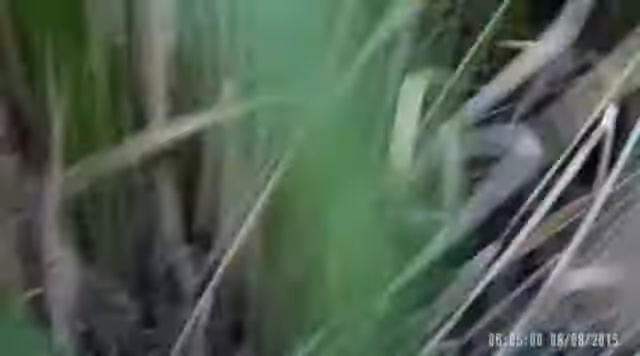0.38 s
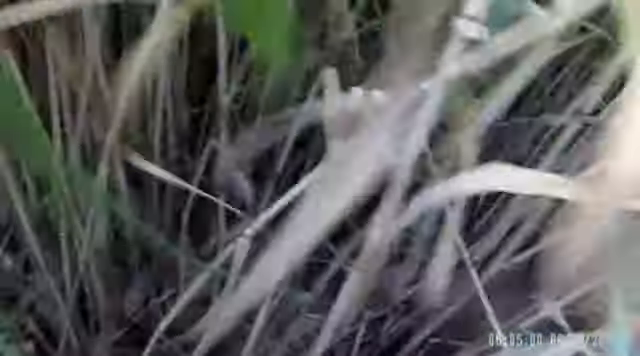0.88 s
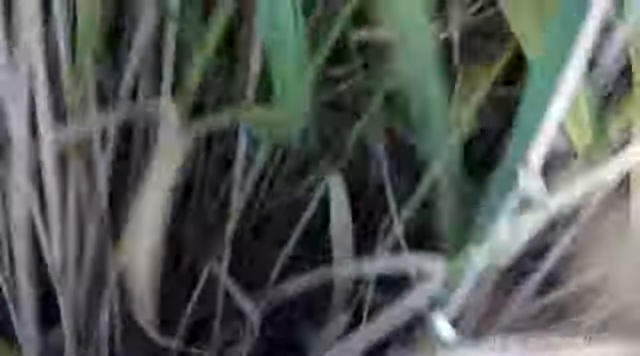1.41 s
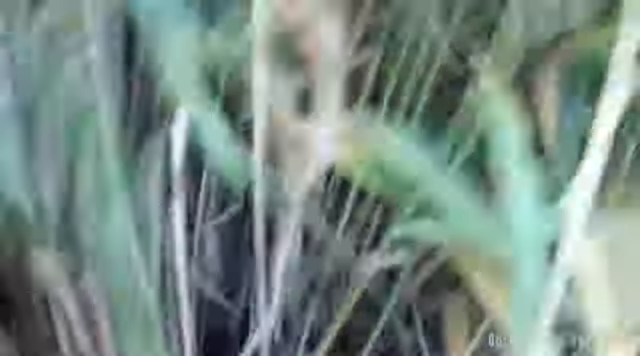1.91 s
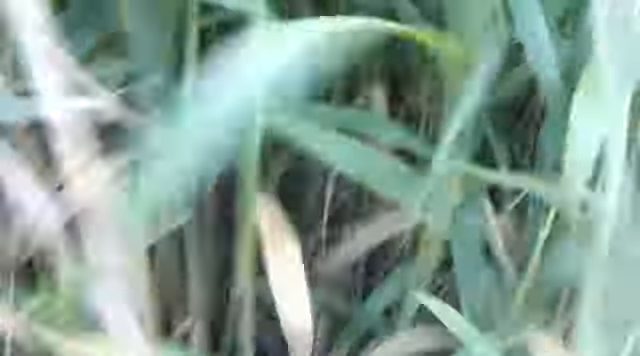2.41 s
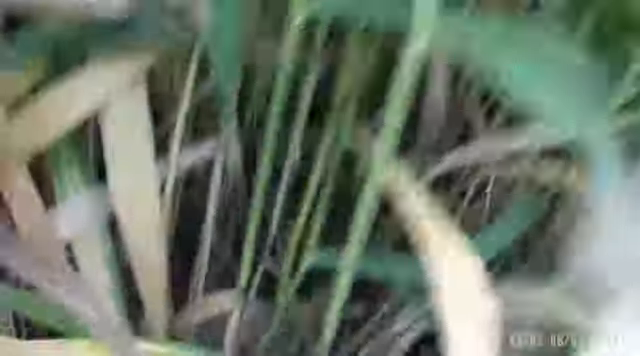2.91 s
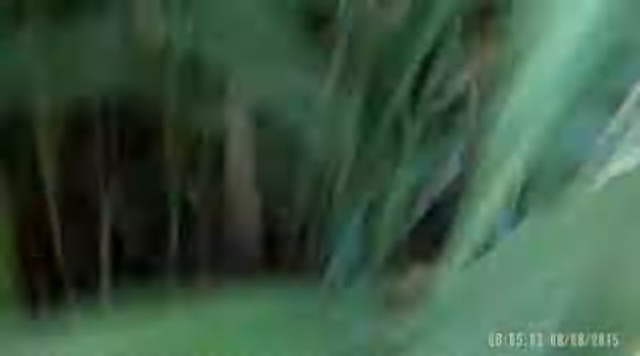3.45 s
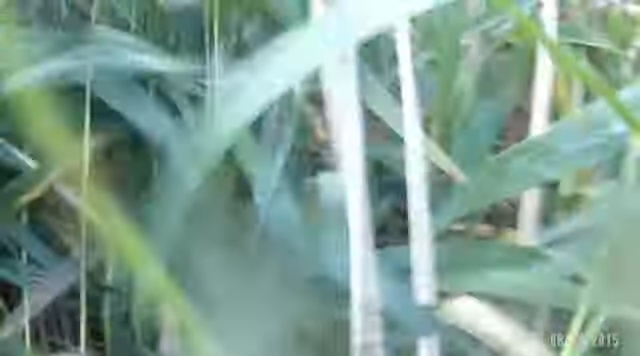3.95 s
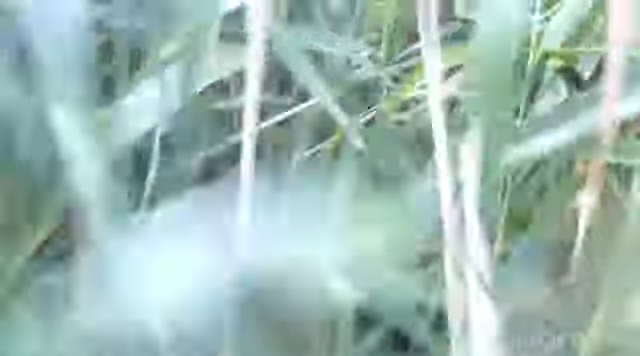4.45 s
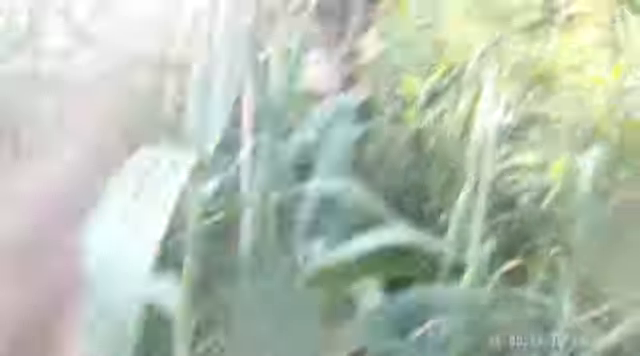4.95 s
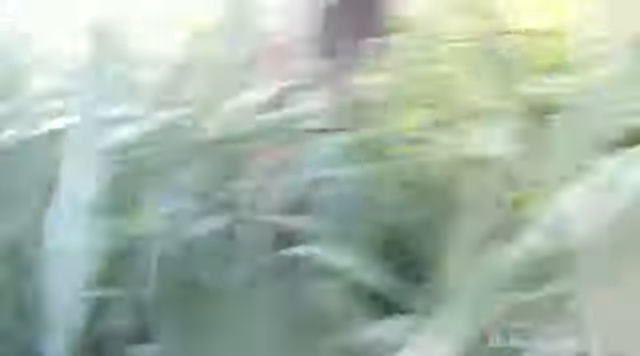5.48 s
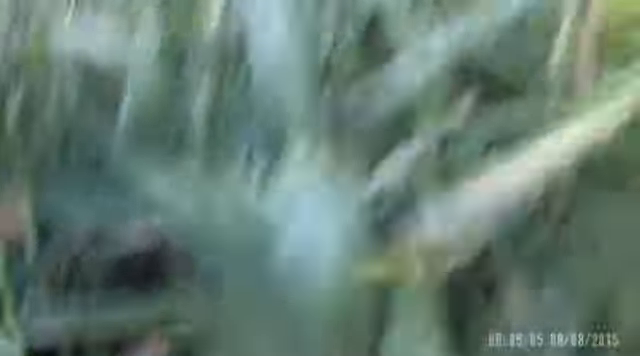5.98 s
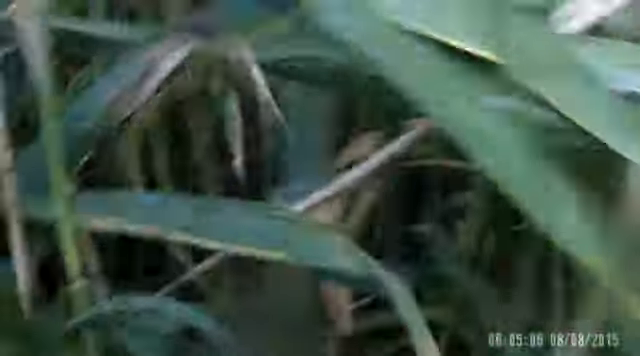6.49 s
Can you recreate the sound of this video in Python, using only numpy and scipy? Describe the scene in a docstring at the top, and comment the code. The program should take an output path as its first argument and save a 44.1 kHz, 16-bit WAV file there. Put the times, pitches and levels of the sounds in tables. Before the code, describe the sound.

Close, dry rustling as a person pushes through thick marsh reeds outdoors. Leaves swish in overlapping sweeps, stems scrape, cloth rubs the body-worn camera. Soft knocks and brittle snaps scatter through, crowding together just before four seconds. After five, two firm knocks precede one enormous, distorted thump; then the rustling thins. The microphone sits inside the small housing, practically mono, with no echo and faint hiss.

```python
"""Someone wearing a small camera pushes through dense marsh reeds: leaves swish, stems scrape and cloth rubs
from the start, as patchy friction noise over a low body sway and faint hiss. Soft knocks come at once, then
snaps: crackling noise bursts with a leafy shiver. Both crowd together just before four seconds; after five come
two more firm knocks, then one very hard blow that overloads the input, and sparser rustling to the end.
Each knock is a short push and rebound that rings the housing's low modes."""
import sys
import numpy as np
from scipy import signal
from scipy.fft import rfft, irfft
from scipy.io import wavfile
from scipy.ndimage import uniform_filter1d, map_coordinates

SR = 44100
rng = np.random.default_rng(int(sys.argv[2]) if len(sys.argv) > 2 else 0)


def ratio(d):
    """dB to gain"""
    e = np.asarray(d, float) / 20
    return 10 ** e


def waveform_to_disk(signal):
    """Save audio, clipped to [-1, 1], as 16-bit WAV at the path in sys.argv[1]."""
    frames = np.transpose(np.atleast_2d(signal))
    scaled = np.clip(frames, -1, 1) * 32767
    samples = np.round(scaled).astype(np.int16)
    wavfile.write(sys.argv[1], SR, samples)


N = 291632  # length [samples]

# lurches of the body from step to step: (time [s], level [dB])
LURCHES = [(0.0, -65), (0.16, -63), (0.4, -70), (1.16, -72), (1.25, -67), (1.86, -60), (2.08, -66),
           (2.82, -69), (3.42, -65), (3.62, -56), (3.87, -59), (4.33, -71), (4.53, -67.5), (5.39, -62.5),
           (5.49, -58.5), (6.17, -74), (6.28, -70), (6.61, -69)]
# armfuls of leaves sweeping past; rise and fall are the times to 6 dB below the peak:
# (peak time [s], leaf level [dB], rise [s], fall [s], dry edge over leaf [dB])
LEAF_SWEEPS = [(.17, -45.5, .2, .16, -2.5), (.46, -48.5, 0.17, 0.18, -6.5), (.81, -45.5, 0.069, 0.099, -2),
               (.94, -49.5, 0.086, 0.088, 0), (1.68, -50, 0.065, 0.11, -5), (1.86, -45.5, 0.11, 0.14, -2.5),
               (2.04, -49.5, 0.093, 0.2, -2), (2.27, -49, 0.075, .08, -2), (2.42, -49, 0.12, 0.098, 0),
               (2.7, -59.5, 0.22, 0.083, 0), (3.05, -58, 0.15, 0.13, 1.5), (3.54, -51.5, 0.12, 0.11, -2.5),
               (3.75, -48, 0.13, 0.085, -2.5), (3.93, -48, 0.1, 0.1, -2), (4.07, -53, 0.078, 0.15, -1),
               (4.64, -49, 0.13, 0.12, -1), (4.83, -50.5, 0.12, 0.17, -4.5), (5.36, -52, 0.11, 0.13, -1),
               (5.56, -55.5, 0.1, 0.096, -13), (5.84, -54, .1, .07, -3), (6.02, -49.5, 0.13, 0.13, -3),
               (6.5, -54.5, 0.31, 0.19, -3.5)]
# reeds dragging along clothing and housing, rise and fall as above:
# (peak time [s], cloth level [dB], rise [s], fall [s], stem scrape over cloth [dB])
REED_DRAGS = [(.07, -55.5, .12, 0.18, 2.5), (.66, -57, 0.12, 0.087, -11), (.8, -52.5, 0.058, 0.097, 7),
              (.95, -57.5, 0.039, 0.069, 6), (1.2, -57.5, 0.034, 0.059, -4),
              (1.44, -55.5, 0.11, 0.065, -17), (1.6, -57, 0.058, 0.14, -3), (1.84, -52, 0.072, 0.095, 3),
              (2.03, -54, 0.11, 0.12, 1), (2.24, -52.5, 0.048, 0.076, 1.5), (2.4, -53, 0.056, 0.071, 6),
              (2.72, -63, 0.064, .05, -3), (2.89, -59.5, 0.042, 0.1, -1), (3.13, -55.5, .05, 0.21, -12),
              (3.45, -53, 0.091, 0.21, -2), (3.68, -57, 0.09, 0.073, -2), (3.85, -47, .05, .1, 0.5),
              (4.03, -57.5, 0.098, 0.11, 7), (4.64, -55.5, 0.11, 0.17, 2.5), (5.12, -56, 0.1, 0.09, -4),
              (5.35, -51.5, 0.1, 0.11, 2), (5.69, -55.5, 0.058, .06, -8), (5.88, -55.5, 0.062, 0.085, -0.5),
              (6.02, -53.5, 0.1, 0.083, 0), (6.58, -58.5, 0.094, .1, 1)]
# broad green blades sliding over the camera, hissing higher than dry ones: (time [s], share [0-1])
GREEN_BLADES = [(0, 0.33), (.5, 0), (1.5, 0.18), (2.5, 0.17), (3.1, 0.17), (3.45, 0.65), (3.8, 0.43),
                (4.1, 0.01), (4.6, 0.26), (5.1, 0.1), (5.8, 0.07), (6.6, 0)]
# stems knocking and shoving the housing:
# (time [s], relative blow level [dB], contact frequency [Hz], contact length [swings])
HOUSING_KNOCKS = [(0.052, -40, 343, 0.82), (1.2435, -37.5, 381, 0.75), (1.812, -48, 95, 1.4),
                  (2.0707, -33, 614, 1.1), (2.1393, -38.5, 408, 1.2), (2.413, -37, 103, 0.73),
                  (2.4956, -24.5, 660, 1.76), (2.6588, -40, 514, 1.2), (2.7748, -39, 597, 1.3),
                  (2.949, -32.5, 640, 1.13), (3.0394, -33, 433, 0.73), (3.3733, -38, 403, 0.86),
                  (3.4145, -41, 373, 1.2), (3.517, -45, 76, 1.5), (3.5536, -27.5, 610, 1.23),
                  (3.8148, -31.5, 269, 1.4), (3.8565, -49, 91, 1.5), (3.817, -43, 92, 1.4),
                  (3.821, -31, 361, 0.77), (3.886, -29, 354, .95), (3.8955, -19.5, 293, .61),
                  (3.9057, -19.5, 400, 0.67), (3.9085, -14.5, 785, 0.85), (3.9113, -26, 296, 1.3),
                  (3.9152, -25, 101, 0.93), (4.005, -45, 87, 1.4), (4.0715, -39, 598, 1.6),
                  (4.5692, -42, 376, 1.4), (5.0893, -26.5, 342, .91), (5.092, -22, 393, 0.7),
                  (5.107, -46, 325, 0.73), (5.4746, -33.5, 395, 0.64), (5.6016, 1, 415, 1.04),
                  (5.6147, -12.5, 311, 0.89), (5.644, -40, 116, 1.3), (5.6755, -44, 74, 1.9),
                  (5.7813, -42, 387, 1.2), (6.124, -55, 124, 7), (6.5742, -38.5, 582, 1.7)]
# ringing modes of the housing: (frequency [Hz], relative level [dB], t60 [s])
HOUSING_MODES = [(74, -14, 0.14), (125, -29, 0.13), (191, -5, 0.13), (249, -1, 0.11), (292.3, 0, 0.079),
                 (400, -11.5, 0.061), (533, -12, 0.087), (655, 5.5, 0.019)]
# stems snapping while their leaves flick:
# (time [s], relative stem level [dB], relative leaf level [dB], dry edge over leaf [dB], burst t60 [s])
STEM_SNAPS = [(0.3855, -55, -42, 0, 0.016), (0.7223, -40.5, -72, -14, .082), (0.768, -43, -57, -13, 0.013),
              (0.7772, -39, -62, -8, 0.0059), (0.7816, -37, -55, -15, 0.0087), (0.788, -35, -66, -4, 0.013),
              (0.7995, -53, -37.5, -2, .006), (.8385, -42, -53, 0, .011), (0.9056, -58, -37, 0, 0.0073),
              (0.9365, -41, -34, 5.5, 0.0053), (.943, -40, -45, -16, 0.016), (0.964, -49, -55, 12, .018),
              (1.4114, -42, -57, 0, .011), (1.6145, -49, -50.5, 3, .013), (1.6453, -42, -39.5, -1, 0.03),
              (2.4212, -40, -51, 3, 0.014), (2.438, -60, -46, -17, .008), (2.46, -47, -39.5, -5, 0.012),
              (2.4693, -48, -50, -10, 0.0073), (2.4868, -40, -38, -8, 0.0071),
              (2.4967, -43.5, -46, -20, .017), (2.5614, -65, -48, 1.5, 0.021), (2.66, -48, -53, -5, .0078),
              (2.7742, -47, -48, -10, 0.023), (2.9493, -39, -39.5, -8, 0.0075),
              (2.9525, -46, -43, -6, 0.021), (2.9849, -45, -62, 9, 0.014), (3.0146, -61, -47, -3, .023),
              (3.0367, -42, -45, 0, 0.039), (3.0416, -49, -47, 0, 0.015), (3.1037, -38.5, -51, -3, 0.0071),
              (3.1277, -54, -47.5, -18, .003), (3.1528, -61, -46.5, -3, 0.018),
              (3.1615, -66, -44.5, -7, 0.023), (3.1668, -62, -47, -10, .011),
              (3.2632, -69, -43.5, -16, .009), (3.2682, -65, -50, -9, .01), (3.2741, -67, -51, 0, .0075),
              (3.43, -47, -51, -2, .017), (3.4696, -59, -41, -7, 0.016), (3.5143, -60, -43.5, -4, .0082),
              (3.555, -32, -40, -15, 0.0049), (3.688, -46, -42.5, -1, .0039),
              (3.701, -45.5, -64, 12, .0121), (3.7814, -42, -41, -16, .0116), (3.807, -43, -68, -2, .016),
              (3.8203, -32, -31, -22, 0.0079), (3.8495, -47, -60, -10, .008),
              (3.8848, -49, -37.5, -5, .014), (3.897, -41, -41, -15, 0.0039),
              (3.9055, -37, -33.5, -6.5, 0.027), (3.9079, -34, -36, -14, 0.048),
              (3.916, -56, -45, -4, 0.012), (3.9732, -70, -46, 8.5, .0037), (4.013, -45, -45, -2, 0.0063),
              (4.0256, -42, -42, -5, 0.026), (4.071, -38, -41.5, 2, .02), (4.217, -46, -64, -10, .012),
              (5.0893, -46.5, -42.5, 5, 0.0044), (5.1653, -45.5, -56, -12, .034),
              (5.3492, -50, -42, 1, 0.022), (5.3545, -62, -47.5, 10, 0.023),
              (5.4163, -48, -44, -14, 0.0096), (5.6015, -11, -11, -16, 0.005), (5.605, -34, -50, -7, .016),
              (5.616, -41, -62, -15, 0.0059), (6.0191, -41, -49, -10, .0129), (6.0437, -48, -62, 0, .0107),
              (6.056, -44.5, -52, -14, .0113), (6.2565, -51, -51, 1, .0155),
              (6.5728, -46.5, -61, -1, .0099)]

# tone of each part through the microphone port, shape only: (frequency [Hz], relative level [dB])
# low sway of the body
SWAY_TONE = [(12, -35), (25, -8), (55, -2), (90, -11.5), (150, -29)]
# clothing rubbing the housing: (frequency [Hz], relative level [dB])
CLOTH_TONE = [(50, -24), (110, 0.5), (230, 0.5), (420, -2), (650, -8), (1100, -31)]
# scraping stems: (frequency [Hz], relative level [dB])
STEM_TONE = [(250, -11.5), (550, -4), (990, -5.5), (1740, -3.5), (2220, -7.5), (2900, -9.5), (4200, -39)]
# dry leaves: (frequency [Hz], relative level [dB])
LEAF_TONE = [(1900, -32), (3100, -7.5), (4200, -2), (5000, -1), (5700, -7.5), (6500, -9), (8000, -41)]
# green blades: (frequency [Hz], relative level [dB])
GREEN_TONE = [(2500, -33), (3900, -9), (4700, -6), (5300, 1.5), (5900, -8), (6700, -12.5), (8200, -31)]
# crisp dry leaf edges: (frequency [Hz], relative level [dB])
EDGE_TONE = [(5200, -30), (6600, -2.5), (8000, -3), (10400, -0.5), (11800, -3), (13300, -9.5), (14800, -12),
             (16500, -42)]
# faint steady hiss: (frequency [Hz], relative level [dB])
HISS_TONE = [(40, -18), (300, -1.5), (800, -0.5), (2000, -13.5), (6000, -5), (14000, -2.5), (16500, -26)]
# snapping stalk: (frequency [Hz], relative level [dB])
STALK_TONE = [(450, -30), (900, -9), (1200, -1), (1850, 0), (2300, -4), (3000, -12), (4200, -32)]
# cracking husk: (frequency [Hz], relative level [dB])
HUSK_TONE = [(4800, -10), (6000, -6.5), (7700, 6), (8600, -3), (10000, -24)]


def unit(x):
    """Scales a sound to rms 1."""
    return x / np.sqrt(np.mean(x ** 2) + 1e-20)


def wobble(rate):
    """A smooth random curve with rate knots a second."""
    knots = rng.standard_normal(int(N * rate / SR) + 4)
    return map_coordinates(knots, [np.arange(N) * rate / SR])


def follow(table):
    """Joins the (time, value) points of a table by straight lines, sample by sample."""
    return np.interp(np.arange(N) / SR, *np.transpose(table))


def coloured(x, tone, size=4096):
    """Gives x a tone through a causal filter; white noise keeps its power."""
    hz, db = np.transpose(tone)
    grid = np.fft.rfftfreq(size, 1 / SR)
    shape_db = np.interp(np.log(grid + 1), np.log(hz), db, left=-60, right=-60)
    # folding the cepstrum forward gives minimum phase, so the sound starts at once
    cepstrum = irfft(np.log(ratio(shape_db)))
    cepstrum[1:size // 2] *= 2
    cepstrum[size // 2 + 1:] = 0
    response = irfft(np.exp(rfft(cepstrum)))
    response *= np.hanning(2 * size)[size:] ** 2  # no long ringing
    response /= np.linalg.norm(response)
    filtered = signal.fftconvolve(np.atleast_2d(x), response[None], axes=1)
    return filtered[:, :x.shape[-1]].reshape(x.shape)


def strokes(rows):
    """Summed power of bell-shaped strokes, plain and with their last column added."""
    peak, db, rise, fall, other_db = np.transpose(rows)[:, :, None]
    late = np.arange(0, N + 64, 64) / SR - peak  # one point every 64 samples
    bells = ratio(db - 6 * (late / np.where(late < 0, rise, fall)) ** 2) ** 2
    powers = bells.sum(0), (bells * ratio(other_db) ** 2).sum(0)
    return [np.interp(np.arange(N) / 64, np.arange(len(p)), p) for p in powers]


def friction(per_second, spread_db, top_db, life, smooth, clump_db, patchy_db):
    """Countless slips of uneven size, each a short scratch (t60 life [s]), over the blur of farther ones."""
    count = int(per_second * N / SR)
    draws = rng.random((count, 2))
    sizes_db = -spread_db * np.log(1 - draws[:, 1])
    sizes = ratio(top_db * np.tanh(sizes_db / top_db))  # many small, none huge
    starts = np.bincount((draws[:, 0] * N).astype(int), sizes ** 2, N)
    fade = ratio(-120 * np.arange(SR // 10) / SR / life)  # a fade of power
    scratches = np.abs(signal.fftconvolve(starts, fade)[:N])
    power = smooth + scratches / scratches.mean()
    # noise whose level drifts in patches over time and pitch
    z = signal.stft(rng.standard_normal(N), nperseg=512)[2]
    field = rng.standard_normal(z.shape)
    field = uniform_filter1d(uniform_filter1d(field, 6, 0), 10, 1)
    noise = signal.istft(z * ratio(patchy_db * unit(field)), nperseg=512)[1][:N]
    return np.sqrt(power) * noise * ratio(clump_db * wobble(25))


def rustle():
    """Sweeps and drags set each friction part's level over the body's low sway; one brush shakes them all."""
    leaf_power, edge_power = strokes(LEAF_SWEEPS)
    rub_power, scrape_power = strokes(REED_DRAGS)
    stem_power = scrape_power + leaf_power * ratio(-5.5) ** 2  # stems scrape along with every leaf sweep

    # the reeds never rest: each part keeps a level between strokes [dB]
    leaf_level = np.sqrt(leaf_power + ratio(-56) ** 2)
    edge_level = np.sqrt(edge_power + ratio(-59.5) ** 2)
    rub_level = np.sqrt(rub_power + ratio(-63.5) ** 2)
    stem_level = np.sqrt(stem_power + ratio(-55.5) ** 2)

    brush = wobble(12)
    leaves = friction(700, spread_db=7, top_db=12, life=0.013, smooth=5, clump_db=0.5, patchy_db=0.8)
    blades = friction(500, spread_db=2, top_db=12, life=0.014, smooth=2, clump_db=1.1, patchy_db=2.6)
    cloth = friction(90, spread_db=6, top_db=15, life=0.0074, smooth=0.83, clump_db=-1.3, patchy_db=2)
    stems = friction(400, spread_db=5.5, top_db=12, life=0.009, smooth=1.8, clump_db=0.9, patchy_db=1.5)

    sway = unit(coloured(rng.standard_normal(N) + 0.22 * cloth, SWAY_TONE))
    sway *= ratio(follow(LURCHES) + 1.5 * wobble(9))
    rub = unit(coloured(cloth + 0.93 * stems, CLOTH_TONE))
    scrape = unit(coloured(stems + 0.37 * leaves, STEM_TONE))
    green = np.clip(follow(GREEN_BLADES), 0, 1)
    swish = np.sqrt(1 - green) * unit(coloured(leaves, LEAF_TONE))
    swish += np.sqrt(green) * unit(coloured(blades, GREEN_TONE))
    edge = unit(coloured(leaves, EDGE_TONE))
    return (sway
            + rub_level * ratio(0.3 * brush) * rub
            + stem_level * ratio(0.12 * brush) * scrape
            + leaf_level * ratio(0.27 * brush) * swish
            + edge_level * ratio(0.48 * brush) * edge)


def faint_hiss():
    """Steady shaped noise, opposite in sign in the two channels."""
    hiss = ratio(-79) * unit(coloured(rng.standard_normal(N), HISS_TONE))
    return np.array([hiss, -hiss])


def knocks():
    """A stem pushes and bounces off in about one swing, leaving the housing ringing on its low modes."""
    t = np.arange(SR // 4) / SR
    scatter_db = 0.5 * rng.standard_normal((len(HOUSING_KNOCKS), len(HOUSING_MODES)))
    out = np.zeros(N + len(t))
    for (s, db, hz, swings), scatter in zip(HOUSING_KNOCKS, scatter_db):
        # strongest ring when the contact is at 288 Hz, near the main modes; less per octave off
        ring_db = -14 - 6.5 * abs(np.log2(hz / 288))
        contact = np.exp(-(t * hz / swings) ** 4)
        push = contact * np.sin(2 * np.pi * hz * t)
        rebound = contact * np.sin(np.pi * hz * t / swings) ** 2
        blow = push - rebound * push.sum() / rebound.sum()  # the housing returns to rest
        ring = np.zeros(len(t))
        for (mode_hz, mode_db, t60), shift_db in zip(HOUSING_MODES, scatter):
            ring += ratio(mode_db + shift_db - 60 * t / t60) * np.sin(2 * np.pi * mode_hz * t)
        ring *= 1 - np.exp(-t / 0.00048)  # soft onset
        out[round(s * SR):][:len(t)] += ratio(db - 2.2) * (blow + ratio(ring_db) * ring)
    return out[:N]


def snaps():
    """Each snap is a burst of tiny cracks that starts at once; the shaken leaves nearby shiver after it."""
    t = np.arange(SR // 10) / SR
    s, stem_db, leaf_db, dry_db, t60 = np.transpose(STEM_SNAPS)
    # green blades flick where they pass
    green = np.clip(1.7 * np.interp(s, *np.transpose(GREEN_BLADES)), 0.02, 0.98)
    parts = [(stem_db, STALK_TONE),
             (leaf_db + 10 * np.log10(1 - green), LEAF_TONE),
             (leaf_db + 10 * np.log10(green), GREEN_TONE),
             (leaf_db - 5.5 + 0.17 * (leaf_db + 37), HUSK_TONE),  # the husk gains on the leaf in hard snaps
             (leaf_db + dry_db, EDGE_TONE)]
    cracks = rng.standard_normal((len(STEM_SNAPS), len(t)))
    bursts = cracks * ratio(-60 * t / t60[:, None]) * (1 - np.exp(-t / 0.00036))
    bursts[:, 4] -= 4.5  # the first fibre to give is the loudest
    shivers = cracks * ratio(-60 * t / 0.066)
    out = np.zeros(N + len(t))
    for level_db, tone in parts:
        burst = coloured(bursts, tone, size=256)
        burst *= ratio(level_db + 21)[:, None] / np.linalg.norm(burst, axis=1, keepdims=True)
        shiver_db = np.minimum(level_db, -34) - 17  # light leaves shake no harder after a heavy blow
        sounds = burst + ratio(shiver_db)[:, None] * coloured(shivers, tone)
        for start, sound in zip(np.round(s * SR).astype(int), sounds):
            out[start:][:len(t)] += sound
    return out[:N]


def scene():
    """One microphone feeds both channels; only their faint hiss differs."""
    return rustle() + knocks() + snaps() + faint_hiss()


def low_pass(x):
    """Removes everything above the highest recorded frequency."""
    return signal.sosfilt(signal.butter(12, 15450, fs=SR, output="sos"), x)


def record(dry):
    """The input overloads softly towards a ceiling of 0.95, bending the hardest blow."""
    mix = dry / (1 + np.abs(dry / 0.95) ** 4) ** (1 / 4)
    return low_pass(mix)


dry = scene()
out = record(dry)
waveform_to_disk(out)
```